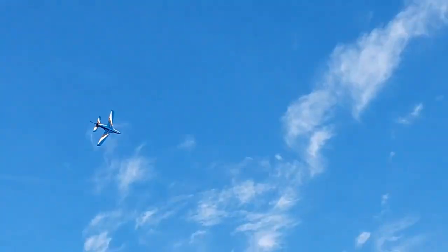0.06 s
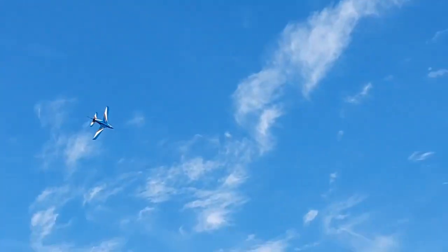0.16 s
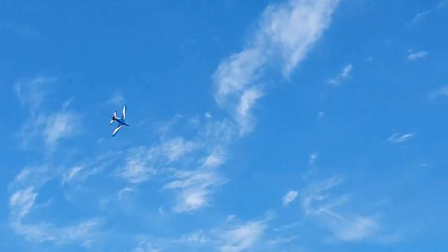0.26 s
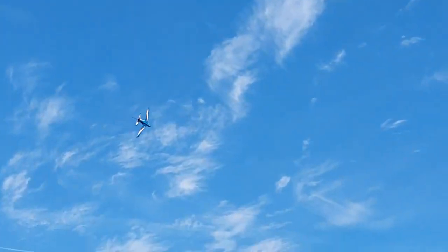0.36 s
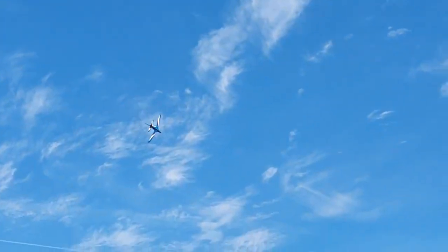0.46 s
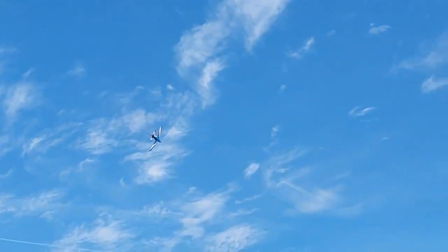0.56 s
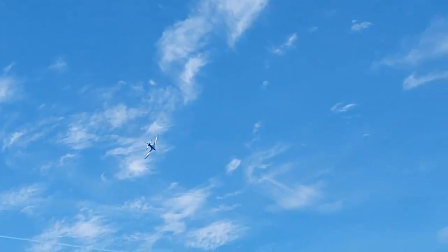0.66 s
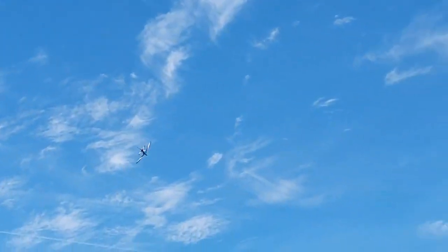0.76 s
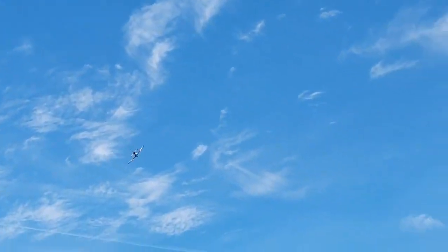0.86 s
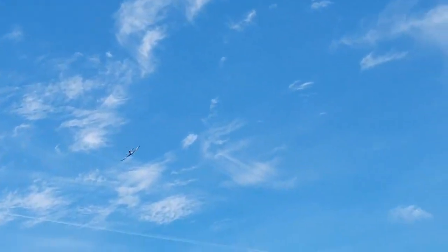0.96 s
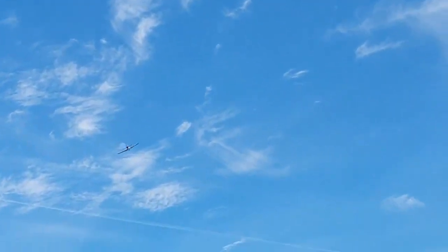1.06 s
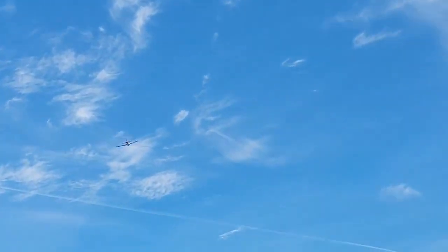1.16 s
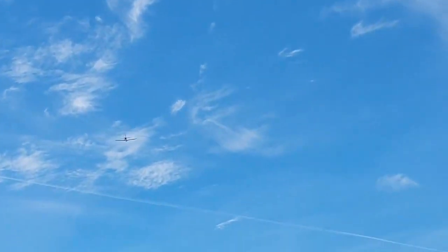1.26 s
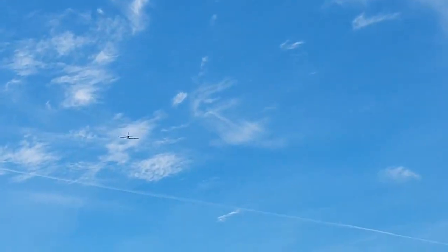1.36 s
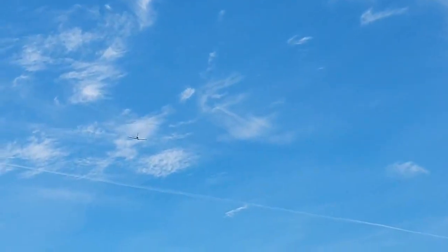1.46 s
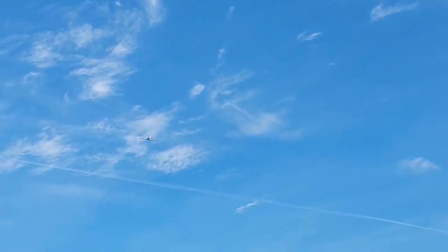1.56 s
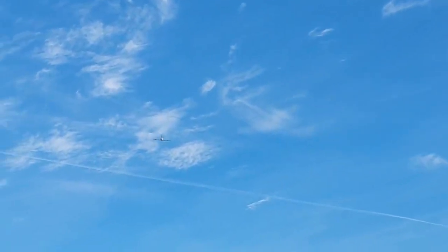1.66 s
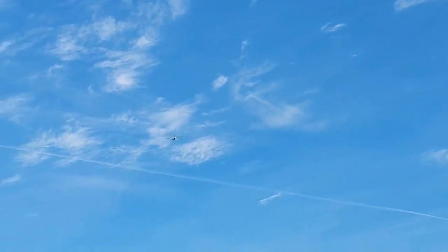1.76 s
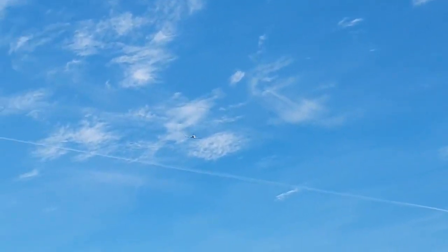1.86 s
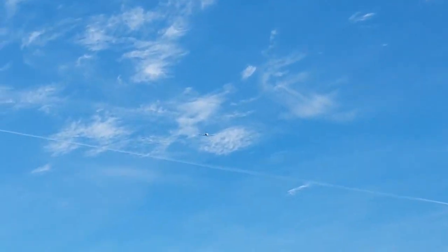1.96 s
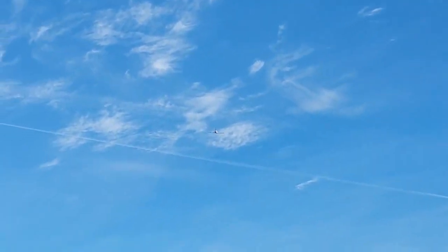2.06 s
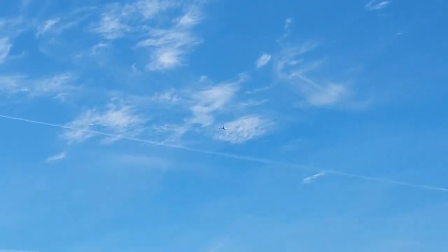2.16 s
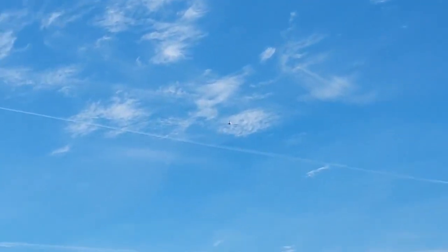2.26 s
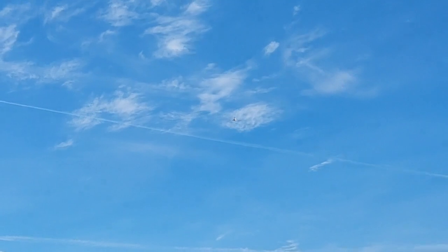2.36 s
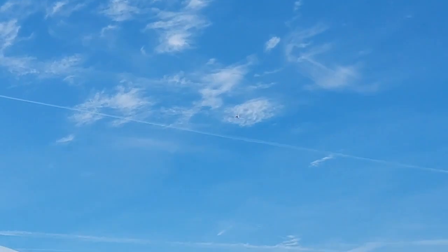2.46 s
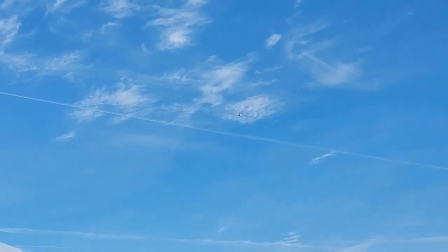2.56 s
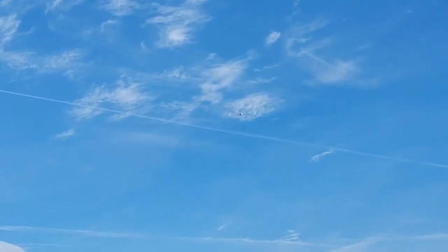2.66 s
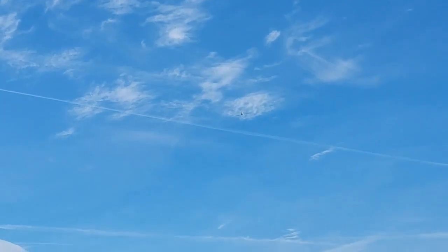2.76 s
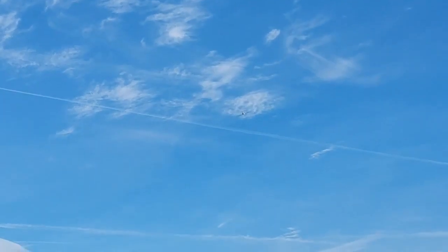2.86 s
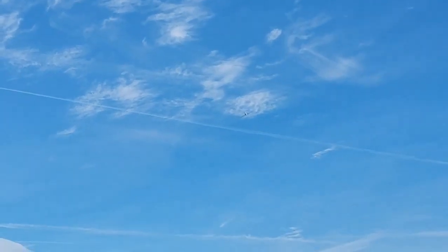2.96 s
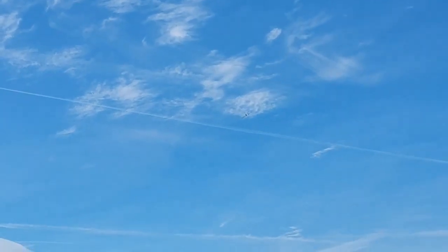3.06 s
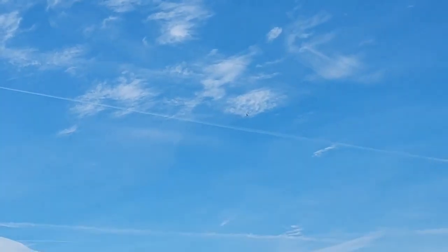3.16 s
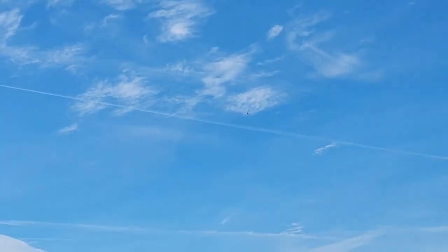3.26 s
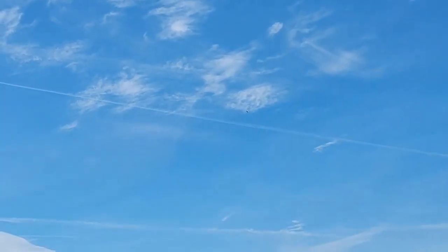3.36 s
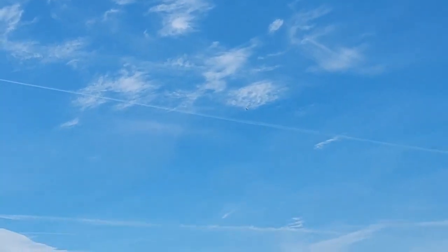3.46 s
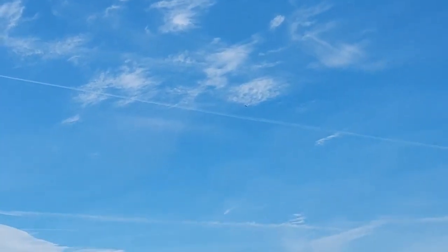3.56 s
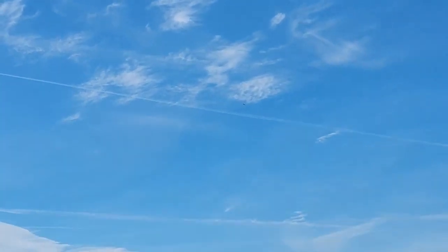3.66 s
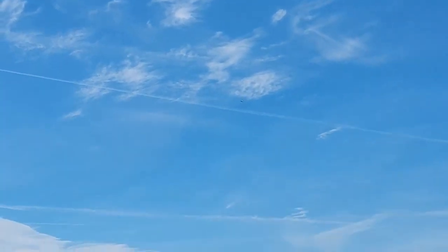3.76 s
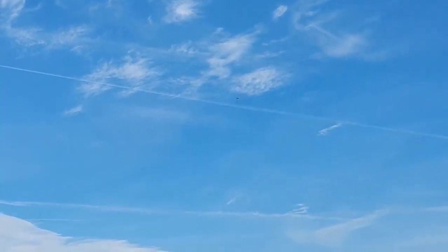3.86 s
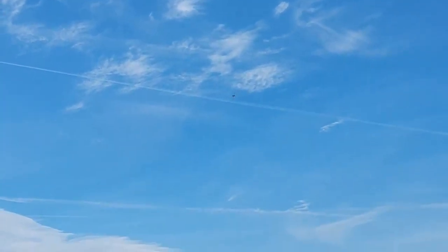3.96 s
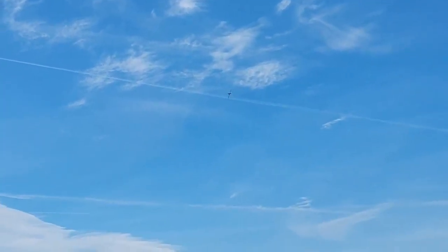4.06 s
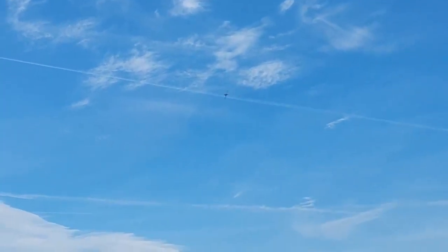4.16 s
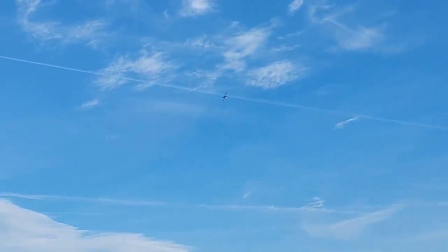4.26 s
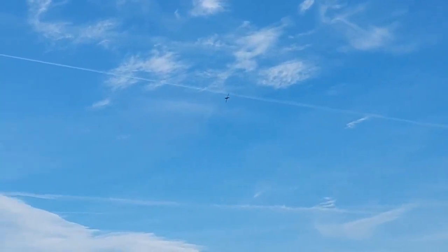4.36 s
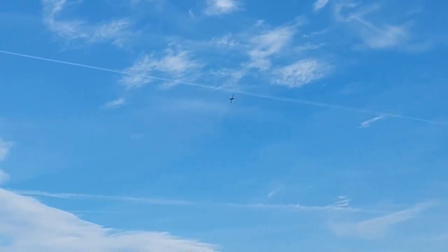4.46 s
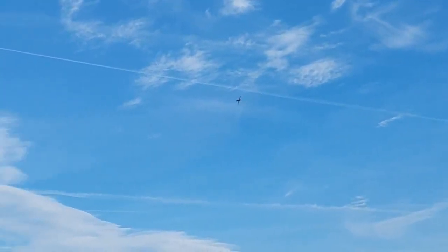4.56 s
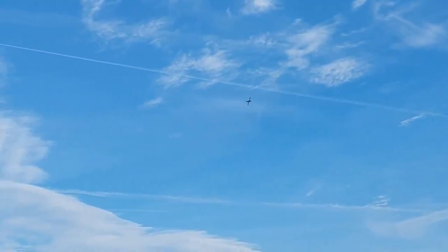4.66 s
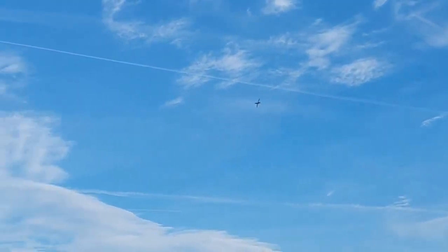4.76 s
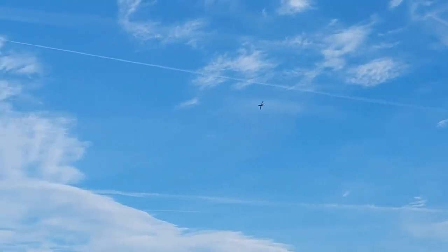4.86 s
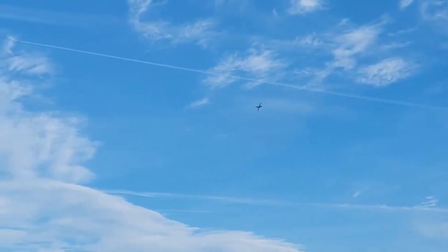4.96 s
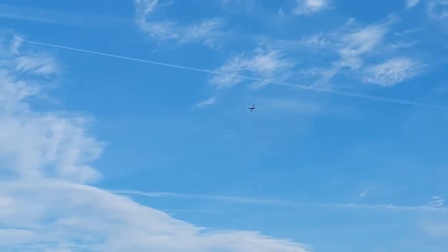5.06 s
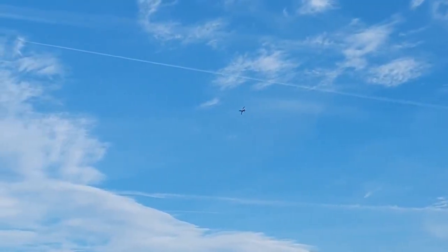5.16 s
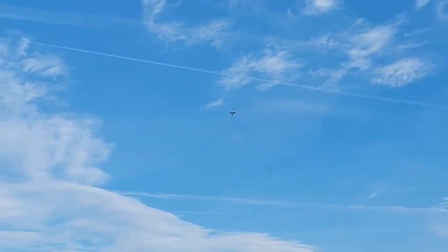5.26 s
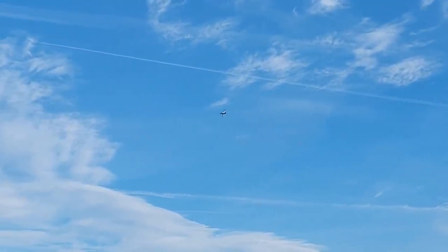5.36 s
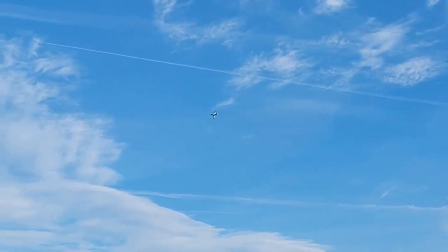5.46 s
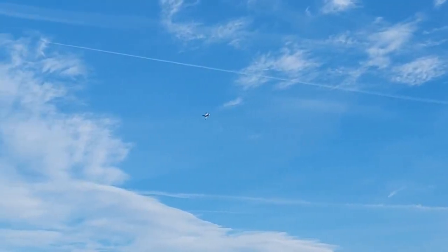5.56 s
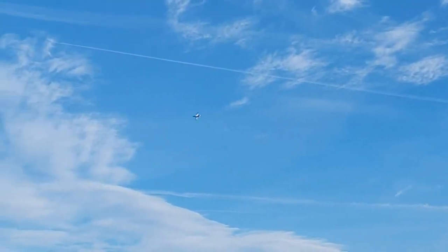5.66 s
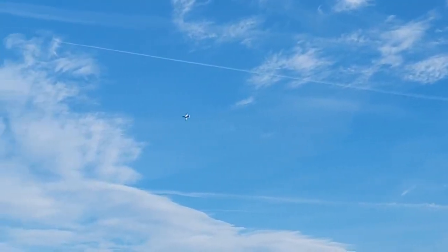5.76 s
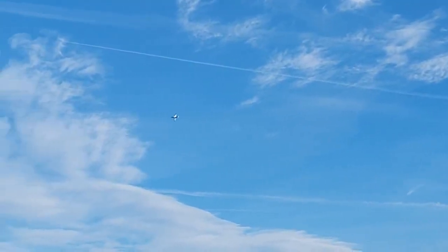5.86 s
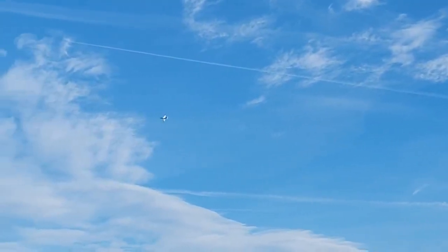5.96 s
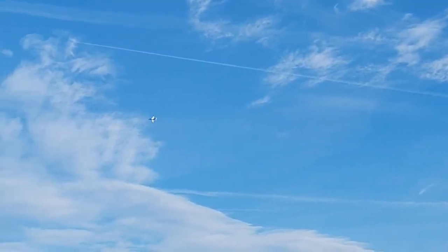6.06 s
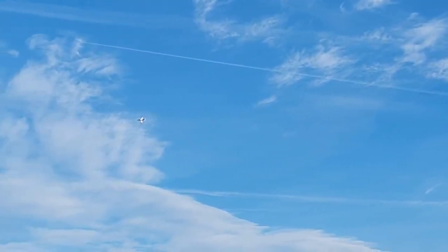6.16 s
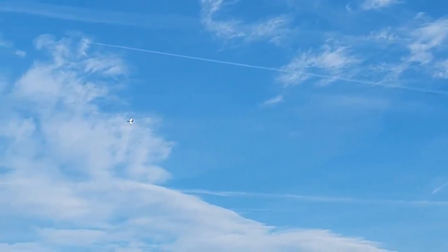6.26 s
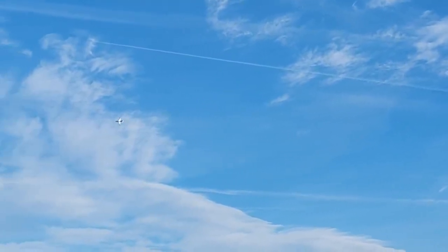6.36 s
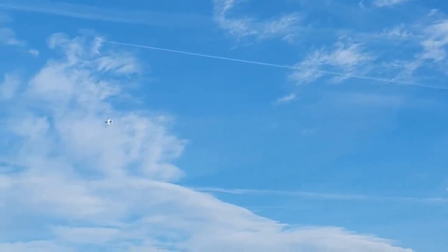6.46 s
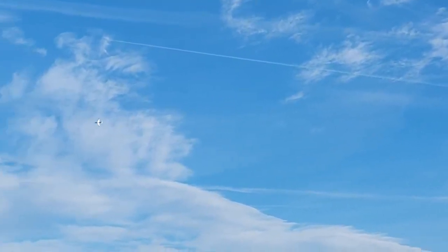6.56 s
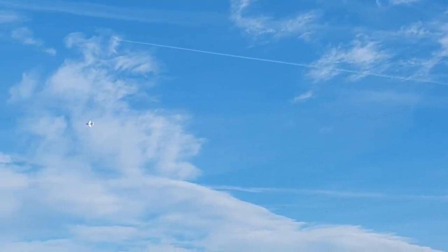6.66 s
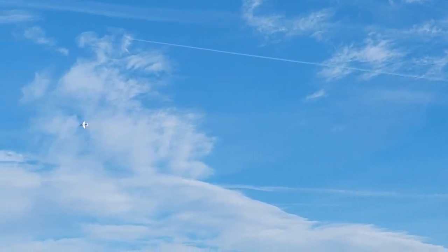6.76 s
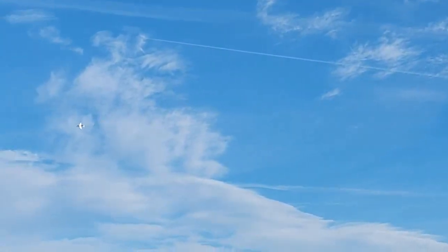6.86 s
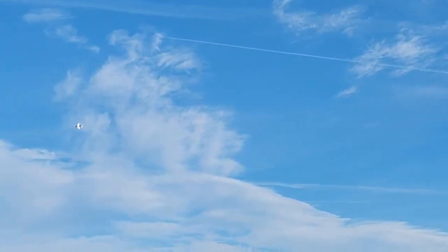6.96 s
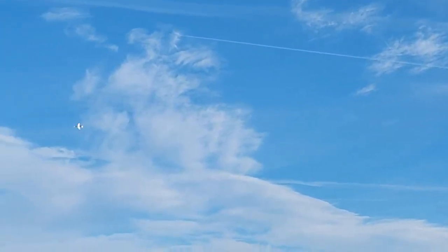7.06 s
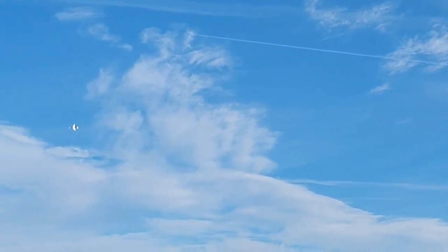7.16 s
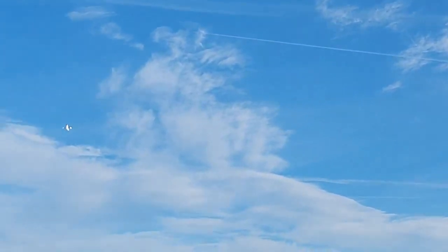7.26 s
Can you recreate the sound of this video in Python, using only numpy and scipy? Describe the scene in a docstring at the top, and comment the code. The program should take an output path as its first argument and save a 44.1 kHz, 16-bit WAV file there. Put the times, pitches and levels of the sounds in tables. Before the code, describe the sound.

Outdoors in an open field, a handheld stereo microphone catches the breathy roar of a model jet flying away. The loud opening hiss drops quickly to a softer, hollow, slowly shifting rush that dips, swells again and flutters. Wind rumbles and bumps irregularly against the microphone for about four seconds, then mostly calms. A soft rustle passes, and crisp little snaps at the left come just before the end.

```python
"""A bright jet roar comes first; within a second it dulls and sinks as the jet flies off over an open field.
Far off the roar swells and brightens again in bursts, while its highest treble keeps fading. It is filtered
noise mixed with its own ground reflection, so a comb of notches climbs as the jet sinks to the horizon.
A faint turbine whine of wavering sines rides on top. Wind noise buffets two microphone ports in swells, with a
few deep shudders. Twice filtered noise rustles, short snaps crackle near the end, and a noise bed is the field."""
import sys
import numpy as np
from scipy import signal
from scipy.fft import rfft, irfft, next_fast_len
from scipy.io import wavfile
from scipy.ndimage import uniform_filter1d

SR = 44100
rng = np.random.default_rng(int(sys.argv[2]) if len(sys.argv) > 2 else 0)


def inscribe(sig):
    """Save sig as 16-bit PCM at rate SR to the path in sys.argv[1].

    A 1-D sig is mono; a 2-D sig holds one channel per row.
    Samples are clipped to [-1, 1] before scaling.
    """
    pcm = np.round(np.clip(np.atleast_2d(sig).T, -1, 1) * 32767)
    wavfile.write(sys.argv[1], SR, pcm.astype(np.int16))


N = 322573
TIME = np.arange(N) / SR  # seconds


# Registers of the roar: low roar, upper roar, edge and hiss.
# Each row: low edge in Hz, high edge in Hz, gain in dB, dB per dB of brightness, dB per dB of deep roar.
ROAR_REGISTERS = [(556, 1195, -7, -0.2942, 0.62), (1280, 1797, 2, 0.32, -0.13), (1770, 1997, 1, 0.5721, 0),
                  (2650, 3590, -2, 1.0474, -0.27)]
# Relative colour of the roar, with fixed bumps and hollows. Each row: frequency in Hz, level in dB.
ROAR_COLOUR = [(100, -26), (230, -13), (330, -4.5), (450, -10.5), (620, 3.5), (790, -1.5), (880, -1),
               (980, -4.5), (1100, -2), (1210, -6.5), (1300, -3), (1420, -2.5), (1580, -1.5), (1820, -2.5),
               (2100, -5), (2250, -9.5), (2450, -11.5), (3500, -15.5), (4900, -14.5), (6400, -19),
               (8300, -19), (9800, -27), (12500, -29.5), (15500, -39)]
# The deepest jet noise swells, then drops back. Each row: time in seconds, level in dB.
DEEP_ROAR = [(0, -2), (1.4, 1), (2.6, 5), (3.5, 5.5), (4.6, 0), (5.4, -6.5), (7.3, -1.5)]
# The roar as it arrives.
# Each row: time in seconds, loudness in dB, brightness in dB (both feed the registers).
FLIGHT_CURVE = [(0, -24.5, -5), (.07, -26.5, -8.5), (.14, -28, -13.5), (.4, -28.5, -15.5), (.6, -30, -15.5),
                (.67, -30, -17.5), (.75, -31.5, -15.5), (.92, -34, -16), (1.1, -36, -18.5),
                (1.9, -36, -16.5), (2.4, -40, -17.5), (2.68, -42.5, -14), (2.92, -39, -13.5),
                (3.2, -40, -13), (3.7, -41, -18.5), (4.35, -44.5, -25), (4.6, -39.5, -19.5),
                (4.85, -37, -23), (5.27, -36, -19), (5.5, -37.5, -22), (5.62, -34, -21),
                (5.88, -37.5, -15.5), (6.02, -37.5, -18.5), (6.24, -38.5, -15.5), (6.33, -40.5, -11),
                (6.48, -40, -12.5), (6.72, -35, -13.5), (6.88, -42.5, -12.5), (7.03, -45.5, -12),
                (7.15, -38, -13), (7.26, -36.5, -13.5), (7.31, -38.5, -9.5)]
FRAME = 2048  # samples


def exhaust(flutter_db=0.44, patchy_db=3.0, deep_hz=480):
    """Turbulent jet noise, dulled by distance, combed by the ground and stirred by moving air."""
    overlap = FRAME * 3 // 4
    hz, t, white = signal.stft(rng.standard_normal((2, N)), SR, nperseg=FRAME, noverlap=overlap)
    f = hz[:, None]
    deep = along(DEEP_ROAR, t)
    field = gain_of(across(ROAR_COLOUR, f)) * air_loss(t, f) * ground_comb(t, f)
    field = field * gain_of(deep / (1 + (f / deep_hz) ** 8))
    field = field * register_balance(field, hz, t, deep)
    # air turbulence makes the sound twinkle, the treble most
    patches = uniform_filter1d(rng.standard_normal(field.shape), size=6, axis=0)
    patches = evened(uniform_filter1d(patches, size=16, axis=1))
    twinkle_db = flutter_db * drift(t, 8.4) + patchy_db * np.tanh(patches)
    twinkle_db = twinkle_db * np.clip(f / 2000, 0, 4) ** .5
    roar = at_ports(t, f, *white) * field * case_colour(t, f) * surges(t, f) * gain_of(twinkle_db)
    return signal.istft(roar, nperseg=FRAME, noverlap=overlap)[1][:, :N]


def register_balance(field, hz, t, deep):
    """Each register of the roar swells and fades by its own measure; gains steer each to its level."""
    loudness, brightness = along(FLIGHT_CURVE, t), along(FLIGHT_CURVE, t, axis=2)
    centres, gains_db = [], []
    for low, high, db, by_brightness, by_deep in ROAR_REGISTERS:
        wanted_db = loudness + db + by_brightness * brightness + by_deep * deep
        present = (field[(hz > low) & (hz < high)] ** 2).sum(0) / len(hz)
        gains_db.append(wanted_db - 10 * np.log10(present))
        centres.append(np.log(low * high) / 2)
    # blend smoothly from register to register at each moment
    rows = [np.interp(np.log(hz + 1), centres, moment) for moment in np.transpose(gains_db)]
    return gain_of(np.transpose(rows))


# Treble lost in the air on the way. Each row: time in seconds, loss in dB at 10 kHz.
AIR_LOSS = [(0, 4.5), (.5, 3), (1, 5.5), (2, 12), (3, 18.5), (4.2, 22), (5.2, 29), (6.3, 35), (7.3, 49)]


def air_loss(t, hz):
    """Absorption in air grows with the square of frequency."""
    return gain_of(-along(AIR_LOSS, t) * (hz / 10 ** 4) ** 2)


# How strongly the grass reflects. Each row: frequency in Hz, reflected share from 0 to 1.
GRASS_REFLECTION = [(300, 0.69), (750, 0.41), (1150, 0.72), (1500, 0.46), (1850, 0.43), (2300, 0.55),
                    (3200, 0.47), (4500, 0.39), (9000, 0.21)]
# delay of the reflection: far-off base, extra when close, steady shortening as the jet descends
LAG_FAR_MS, LAG_OVERHEAD_MS, SINK_MS_PER_S = 2.54, 2.485, 0.043


def ground_comb(t, hz, turn=1.61):
    """Direct sound plus a late copy, which the soft grass shifts in phase by turn radians."""
    lag = (LAG_FAR_MS + LAG_OVERHEAD_MS * nearness(t) - SINK_MS_PER_S * t) / 10 ** 3
    share = np.clip(across(GRASS_REFLECTION, hz), 0, 1)
    return abs(1 + share * np.exp(-1j * (2 * np.pi * hz * lag + turn)))


RECEDE_S = 1.043  # the angle to the jet settles this fast as it flies off


def nearness(t):
    """Starts at 1 with the jet high and close, falling towards 0 as it recedes to the horizon."""
    return np.exp(-t / RECEDE_S)


# One register of the roar swells or sinks for a moment.
# Each row: middle in seconds, length in seconds, centre in Hz, width in octaves, change in dB.
REGISTER_SURGES = [(0.035, 0.15, 1700, .5, 5), (1.585, .12, 7540, 1.2, 6), (1.8, 0.28, 7500, 0.55, -2.5),
                   (2.45, 0.18, 7500, 1, 3.5), (2.97, 0.8, 2090, .16, 8.5), (3.6, .3, 5700, .5, 4.5),
                   (4.98, 0.16, 4200, 1, 4), (5.2, 0.26, 4550, 0.28, 10.5), (5.25, .35, 7900, 0.21, 5),
                   (5.353, 0.091, 4930, .3, 5), (5.28, 0.19, 1650, .7, 2.5), (5.623, 0.18, 1500, .4, 5.5),
                   (5.89, 0.061, 1700, .7, 4), (5.88, 0.089, 4800, .4, 6), (5.985, 0.083, 4500, .4, 6),
                   (6.263, 0.099, 4500, 1.5, -2), (6.61, 0.098, 5200, 0.56, -5),
                   (6.723, 0.056, 3300, .7, 8.5), (6.787, 0.043, 3300, 0.86, 5), (6.82, .15, 8300, .7, 12),
                   (6.88, .08, 3200, .5, 2), (7.265, 0.078, 3330, 0.21, 14), (7.27, 0.12, 5200, .45, -6)]


def surges(t, hz):
    """Brief swells and dips of one register of the roar."""
    octave = np.log2(hz + 1)
    change_db = 0
    for s, length, centre, width, db in REGISTER_SURGES:
        change_db = change_db + db * swell(t, s, length) * swell(octave, np.log2(centre), width)
    return gain_of(change_db)


# Bumps and hollows from the recorder's case, before the angle shifts and scales them.
# Each row: centre in Hz, width in Hz, height in dB.
CASE_BUMPS = [(1890, 740, -8), (3135, 200, 11), (3570, 140, -7), (5150, 540, 7.5), (5660, 250, -3),
              (10900, 500, 6.5), (13000, 1300, 12)]
# How the angle to the jet alters them. Each row: time in seconds, share of the height, factor on the centre.
CASE_BY_ANGLE = [(0, 0.63, 1), (.6, 0.75, 1), (1.4, 0.82, 1.007), (2.6, 0.37, 1.07), (5.3, 0.2, 1.04),
                 (6.1, 0.27, 0.94), (6.75, 0.52, 1.12), (7.3, 0.59, 0.98)]


def case_colour(t, hz):
    """Bumps and hollows from diffraction round the recorder; they slide as the angle to the jet changes."""
    shift = along(CASE_BY_ANGLE, t, axis=2)
    bumps = sum(db * swell(hz, centre * shift, width) for centre, width, db in CASE_BUMPS)
    return gain_of(along(CASE_BY_ANGLE, t) * bumps)


# How the two ports differ.
# Each row: frequency in Hz, likeness from 0 to 1, left lead in radians, left minus right in dB.
PORT_DIFFERENCES = [(500, 1, 0, 0.5), (760, 1, 0.23, -1.5), (1480, 0.93, 0.4, -2.5), (2500, 0.69, -0.5, -1),
                    (3040, 0.73, -0.5, 3), (3810, 0, -0.5, 0), (3740, 1, 0.9, 8.5), (4250, 0.63, -3, -2.5),
                    (5760, 0.2, -3, 6.5), (7440, 0.3, -4, 6.5), (8900, 0.6, -5, 3.5),
                    (13300, 0.4, -1.5, -1.5)]
LEAD_MS = .16  # extra lead of the left port at full nearness


def at_ports(t, hz, a, b):
    """Two noise fields become one partly coherent sound at the left and right ports."""
    same = np.clip(across(PORT_DIFFERENCES, hz), 0, 1)
    lead = across(PORT_DIFFERENCES, hz, axis=2) + 2 * np.pi * hz * LEAD_MS * nearness(t) / 10 ** 3
    side = gain_of(across(PORT_DIFFERENCES, hz, axis=3) / 2)
    right = same * a + np.sqrt(1 - same ** 2) * b
    return np.array([a * side, right * np.exp(-1j * lead) / side])


# Turbine speed before it wavers. Each row: time in seconds, shaft frequency in Hz.
SHAFT_SPEED = [(0, 1777), (1.3, 1792), (2.3, 1787), (3.2, 1824), (4.3, 1850), (7.3, 1770)]
# Strength of the whine that all harmonics share. Each row: time in seconds, level in dB.
WHINE_LEVEL = [(1.5, -94), (2.3, -38.5), (3.1, -37), (3.8, -68.5), (5, -46), (7.3, -57)]
# The harmonics. Each row: multiple of the shaft speed, level in dB relative to the whine's strength.
WHINE_HARMONICS = [(1, -11), (3, -20), (6, -47)]


def turbine(waver=0.0013, fading_db=3):
    """A few shaft harmonics that waver and fade in and out on their way through the air."""
    t = TIME[::100]
    hz = np.interp(TIME, t, along(SHAFT_SPEED, t) * (1 + waver * drift(t, 25)))
    turns = np.cumsum(hz) / SR
    out = np.zeros((2, N))
    for order, db in WHINE_HARMONICS:
        level_db = np.interp(TIME, t, along(WHINE_LEVEL, t) + db + fading_db * drift(t, 13))
        lead = np.array([[0], [across(PORT_DIFFERENCES, order * hz.mean(), axis=2)]])
        tone = np.sin(2 * np.pi * order * turns - lead)
        out += gain_of(level_db) * air_loss(TIME, order * hz) * tone
    return out


# Relative strength of the wind between the gusts. Each row: time in seconds, level in dB.
BREEZE_LEVEL = [(0, -31), (.2, -39.5), (.8, -36), (1.15, -29), (2.1, -35.5), (3.45, -36.5), (3.8, -47),
                (4.3, -38.5), (5.25, -42), (5.6, -35.5), (5.9, -48.5), (6.95, -47), (7.3, -41.5)]
# Gusts that thump the ports.
# Each row: middle in seconds, level in dB, length in seconds, left minus right in dB.
GUSTS = [(0.035, -30, 0.025, 0), (0.058, -29, 0.0072, 11.5), (0.085, -26, 0.013, 1),
         (0.462, -24.5, 0.015, -2.5), (0.569, -22, 0.02, -4), (0.595, -29.5, 0.02, -4),
         (0.682, -28, 0.0092, -2.5), (0.734, -23.5, 0.023, 1), (0.859, -22.5, 0.013, -5.5),
         (0.975, -20.5, 0.013, 0), (1.022, -20, 0.013, 0.5), (1.057, -24.5, 0.0081, 5),
         (1.099, -22.5, 0.012, -3), (1.17, -30.5, 0.028, -1.5), (1.216, -21.5, 0.021, -2.5),
         (1.257, -29, 0.0085, -11), (1.287, -23.5, 0.012, -0.5), (1.397, -26, 0.056, 2),
         (1.47, -28.5, 0.033, 5.5), (1.505, -23.5, 0.0092, -2), (1.576, -28.5, 0.066, -1),
         (1.679, -25.5, 0.013, -4), (1.737, -33.5, 0.042, 12), (1.827, -32.5, 0.022, 8.5),
         (1.904, -23.5, 0.008, 9), (1.949, -24.5, 0.016, 3.5), (1.978, -23.5, 0.024, 0.5),
         (2.047, -23.5, 0.013, 3), (2.184, -22.5, 0.014, -8.5), (2.242, -22.5, 0.032, 2),
         (2.285, -25.5, 0.051, -3.5), (2.392, -26.5, 0.007, -13), (2.49, -28, 0.029, -0.5),
         (2.559, -25.5, 0.021, -1.5), (2.645, -29, 0.022, -4.5), (2.677, -28.5, 0.013, 4.5),
         (2.7, -25.5, 0.0097, 5), (2.766, -25, 0.019, -0.5), (2.877, -25.5, 0.016, -7),
         (2.926, -28.5, 0.036, -2), (3.036, -23.5, 0.012, 2), (3.136, -23, 0.0059, 4),
         (3.234, -24.5, 0.03, 5.5), (3.274, -27, 0.019, 3), (3.396, -27.5, 0.014, -5.5),
         (3.461, -26, 0.021, 3.5), (3.498, -22, 0.0048, 10), (3.683, -32.5, 0.013, 2),
         (4.009, -30, 0.024, 0.5), (4.136, -27.5, 0.0097, 3), (4.257, -21, 0.017, 1.5),
         (4.327, -22.5, 0.008, -3.5), (4.36, -28, 0.016, 0.5), (4.8, -30.5, 0.016, 3),
         (5.444, -29.5, 0.017, -2), (5.487, -30.5, 0.025, -1), (5.562, -33, 0.016, -7.5),
         (5.617, -40, 0.015, 0.5), (5.684, -39, 0.014, 2), (5.721, -31, 0.012, 5), (6.325, -33.5, 0.018, 0),
         (7.122, -32.5, 0.021, 7), (7.229, -31, 0.016, 11.5)]
# Colour of wind on a port. Each row: frequency in Hz, dB in a light breath of air, dB in a strong gust.
WIND_COLOUR = [(15, -27.5, -29), (30.7, -17, -21), (63, 6, -7), (131.3, -1.5, 3), (184, -16, -5),
               (258, -17, -4.5), (387, -10.5, -16), (505, -26.5, -24.5), (900, -37.5, -36.5),
               (2500, -55, -56.5), (8000, -76, -82)]
# small eddies carried by the wind, level relative to it
EDDIES_PER_S, EDDY_S, EDDY_DB, EDDY_SPREAD_DB = 15, 0.017, 3, 2.5


def wind(calm_db=-6, lumpy_db=3.5, steadiness=0.68, strong_db=-36.0, flutter_db=0.94, wake_db=-19, wake_s=0.03):
    """Each port rumbles on its own: a lumpy flow, and short swells of pressure as eddies pass."""
    t = TIME[::20]
    flow = gain_of(calm_db + lumpy_db * np.array([drift(t, 30), drift(t, 30)])) ** 2
    eddies = rng.standard_normal((int(t[-1] * EDDIES_PER_S) + 1, 4))
    for k, (late, size, left_size, right_size) in enumerate(eddies):
        s = (k + late / np.pi) / EDDIES_PER_S
        db = EDDY_DB + EDDY_SPREAD_DB * (size + np.array([[left_size], [right_size]]))
        flow = flow + gain_of(db) ** 2 * swell(t, s, EDDY_S)
    power = flow * gain_of(along(BREEZE_LEVEL, t)) ** 2
    for s, db, length, pan_db in GUSTS:
        wake = gain_of(wake_db) ** 2 * swell(t, s + wake_s / 2, wake_s)  # each gust trails weaker churning
        power = power + (panned(pan_db) * gain_of(db)) ** 2 * (swell(t, s, length) + wake)
    power = np.array([np.interp(TIME, t, p) for p in power])
    # each eddy breaks into smaller ones
    flutter = np.array([np.interp(TIME, t, drift(t, 110)) for _ in power])
    power = power * gain_of(flutter_db * flutter) ** 2
    # faster air sheds smaller eddies, so strong gusts are brighter
    sustained = uniform_filter1d(power, size=4000)
    strong = sustained / (sustained + gain_of(strong_db) ** 2)
    churn = np.sqrt(1 - strong) * noise(WIND_COLOUR) + np.sqrt(strong) * noise(WIND_COLOUR, axis=2)
    # the strength of the flow, more than chance, sets the size of each push
    chance = uniform_filter1d(uniform_filter1d(churn ** 2, size=700), size=500) + 1e-9
    return evened(churn / chance ** (steadiness / 2)) * np.sqrt(power)


# The largest eddies. Each row: middle in seconds, level in dB, length in seconds.
LARGEST_EDDIES = [(1.993, -27, 0.13), (2.27, -28, 0.082), (5.624, -40, 0.31)]
# Their relative colour. Each row: frequency in Hz, level in dB.
SHUDDER_COLOUR = [(15, -22), (35, 0), (58, -2), (90, -3), (150, -30), (500, -68), (4000, -110)]


def deep_gusts():
    """The largest eddies shake the ports with a deep, slow shudder."""
    shape = sum(gain_of(db) * swell(TIME, s, length) for s, db, length in LARGEST_EDDIES)
    return shape * noise(SHUDDER_COLOUR)


# Soft rustles at the microphone. Each row: start of full strength in seconds, level in dB, hold in seconds,
# fade in dB per second, left minus right in dB, graininess in dB.
SOFT_RUSTLES = [(5.507, -53, 0.12, 31, -3.5, 2.6), (7.153, -60, 0.082, 352, 7, 3.5)]
# Their relative colour. Each row: frequency in Hz, level in dB.
RUBBING_COLOUR = [(1000, 14.5), (3000, -17), (6000, 3.5), (10000, -5), (12000, 1.5), (14500, 3),
                  (16000, -8)]
RUSTLE_RISE_DB_PER_S = 246


def rustle():
    """Grainy rubbing close to one port: it rises quickly, holds and fades."""
    grains = evened(uniform_filter1d(rng.standard_normal(N), size=90))
    level = 0
    for s, db, hold, fade, pan_db, grain_db in SOFT_RUSTLES:
        rise_db = -RUSTLE_RISE_DB_PER_S * np.maximum(s - TIME, 0)
        fade_db = -fade * np.maximum(TIME - s - hold, 0)
        level = level + panned(pan_db) * gain_of(db + rise_db + fade_db + grain_db * grains)
    return level * noise(RUBBING_COLOUR)


# Small snaps. Each row: time in seconds, push level in dB, crack level in dB.
SNAPS = [(7.1325, -46, -45), (7.15, -32, -40), (7.1835, -16.5, -36), (7.2275, -50, -47),
         (7.235, -50, -46.5), (7.241, -34, -34)]


def snaps(pan_db=18, push_s=0.000085, crack_s=0.00068):
    """Each snap lands beside the left port: one quick push and pull of pressure, and a bright crack."""
    t, out = TIME[:240] - TIME[40], np.zeros((2, N))
    push = -t / push_s * np.exp(1 - abs(t) / push_s)
    for s, push_db, crack_db in SNAPS:
        bright = evened(np.diff(rng.standard_normal(len(t) + 1)))
        crack = bright * np.exp(-abs(t) / crack_s) * (t >= 0)
        snap = gain_of(push_db) * push + gain_of(crack_db) * crack
        start = round((s + t[0]) * SR)
        out[:, start:][:, :len(t)] += gain_of([[0], [-pan_db]]) * snap
    return out


# Relative colour of the still air of the field. Each row: frequency in Hz, level in dB.
FIELD_COLOUR = [(50, -4), (120, -4), (200, -16), (260, -10.5), (340, -2.5), (1000, -1), (3000, -9),
                (7000, -18.5), (10500, -41), (14000, -28.5), (16000, -36.5)]


def quiet_field(level_db=-59):
    """The still air of the field: a steady bed of noise, unrelated left and right."""
    return gain_of(level_db) * noise(FIELD_COLOUR)


def gain_of(db):
    """Decibels to gain."""
    return 10 ** (np.asarray(db) / 20)


def evened(x):
    """Scales to an rms of 1."""
    return x / np.sqrt(np.mean(x ** 2) + 1e-20)


def panned(pan_db):
    """Left and right gains with a mean power of 1."""
    return evened(gain_of(np.array([[pan_db], [-pan_db]]) / 2))


def swell(t, s, length):
    """A bell of the given length around the point s, in time or in pitch."""
    return np.exp(-(2 * (t - s) / length) ** 2)


def drift(t, top_hz):
    """Slow random wandering of rms 1, a sum of sines that are weaker the faster they go."""
    rates = np.geomspace(top_hz / 10, top_hz, 20)
    return evened(sum(np.sin(2 * np.pi * (f * t + rng.random())) / np.sqrt(f) for f in rates))


def noise(colour, axis=1):
    """Two unrelated channels of noise with the given spectrum, at a joint rms of 1."""
    size = next_fast_len(N)
    shape = gain_of(across(colour, np.fft.rfftfreq(size, 1 / SR), axis=axis))
    spectrum = rfft(rng.standard_normal((2, size))) * shape
    return evened(irfft(spectrum, size)[:, :N])


def along(rows, t, axis=1):
    """One column of a curve at the times t."""
    rows = np.array(rows, float)
    return np.interp(t, rows[:, 0], rows[:, axis])


def across(rows, hz, axis=1):
    """One column of a spectrum at the frequencies hz, read on a logarithmic scale."""
    rows = np.array(rows, float)
    return np.interp(np.log(hz + 1), np.log(rows[:, 0] + 1), rows[:, axis])


def scene():
    """The jet, the wind, the rustles, the snaps and the quiet field."""
    jet = exhaust() + turbine()
    return jet + wind() + deep_gusts() + rustle() + snaps() + quiet_field()


CUTOFF_HZ = 15750


def record(dry):
    """The recorder's band limit: a steep lowpass."""
    lowpass = signal.firwin(511, CUTOFF_HZ, window=("kaiser", 9), fs=SR)
    return signal.oaconvolve(dry, lowpass[None], "same", axes=1)


dry = scene()
out = record(dry)
inscribe(out)
```